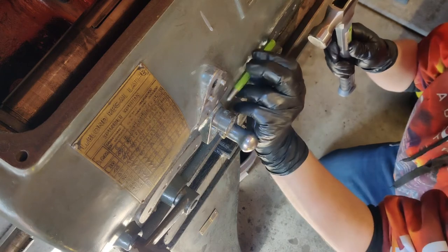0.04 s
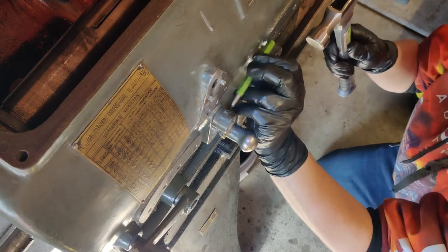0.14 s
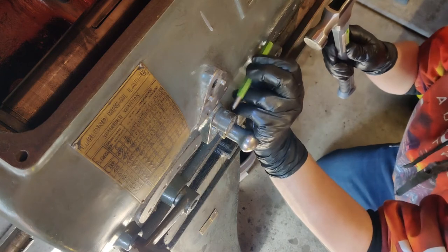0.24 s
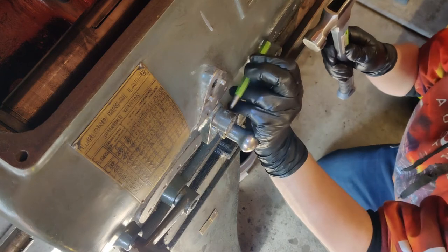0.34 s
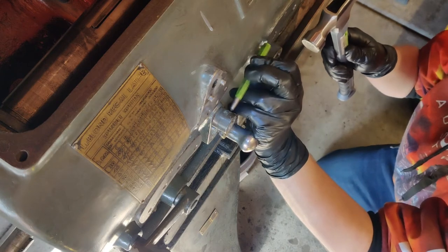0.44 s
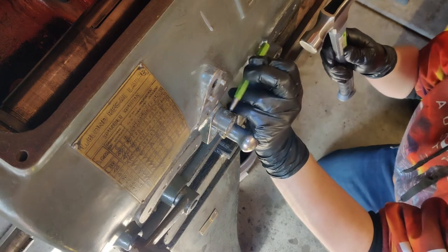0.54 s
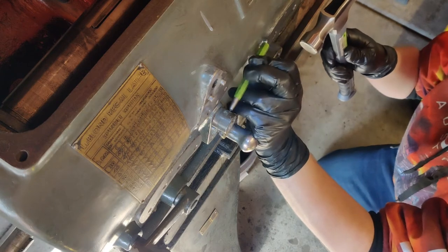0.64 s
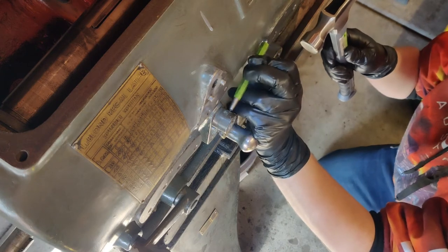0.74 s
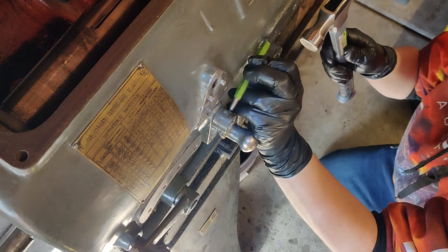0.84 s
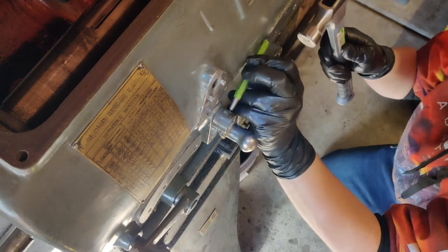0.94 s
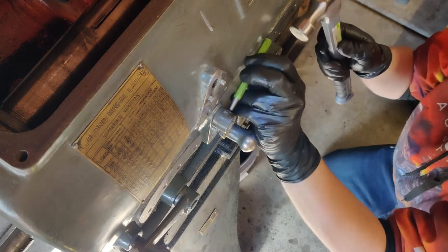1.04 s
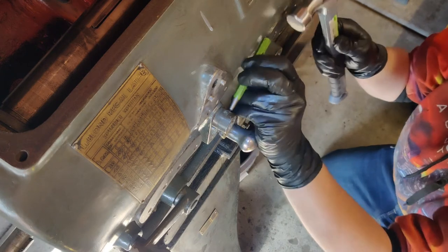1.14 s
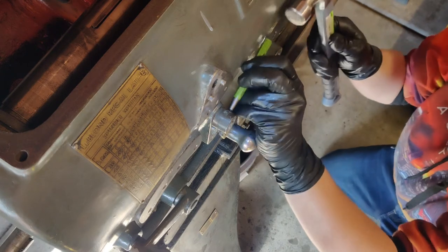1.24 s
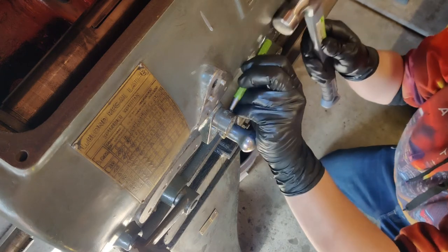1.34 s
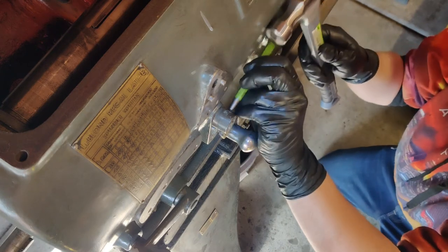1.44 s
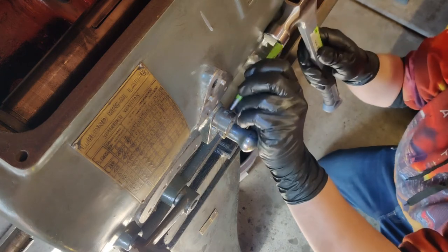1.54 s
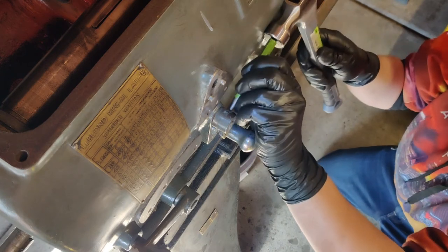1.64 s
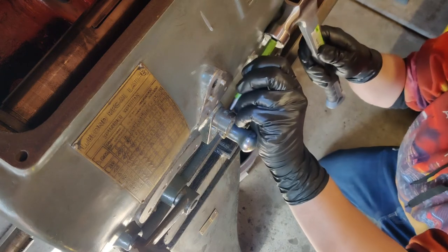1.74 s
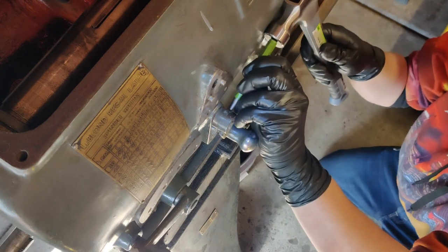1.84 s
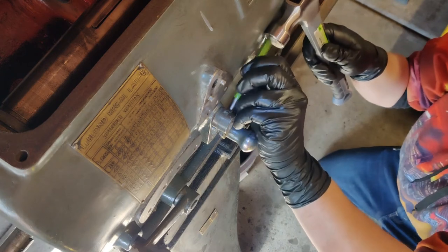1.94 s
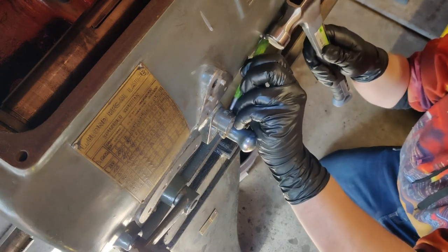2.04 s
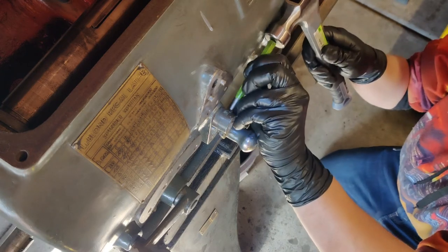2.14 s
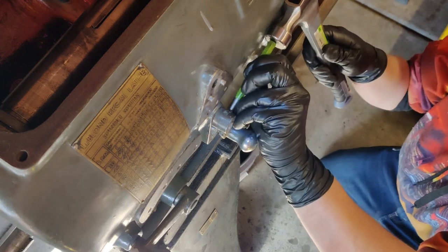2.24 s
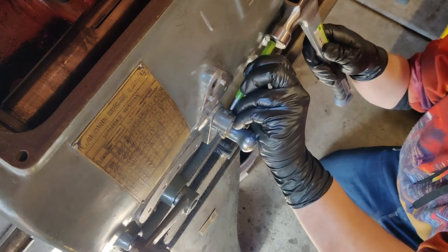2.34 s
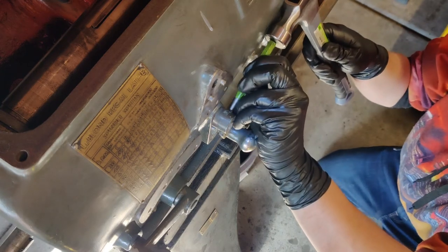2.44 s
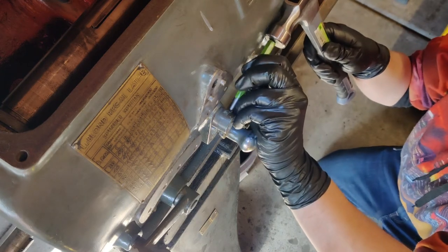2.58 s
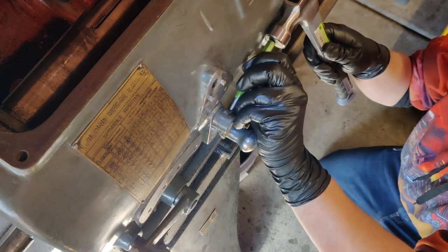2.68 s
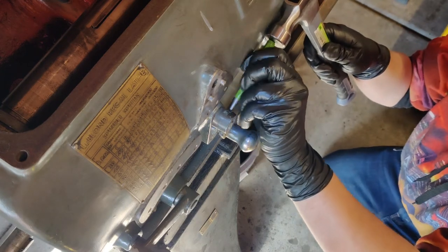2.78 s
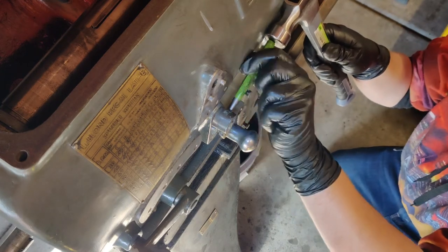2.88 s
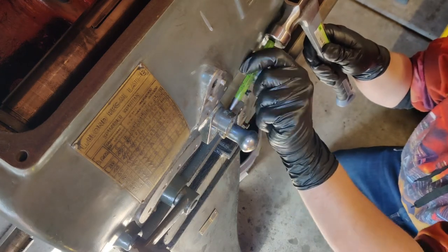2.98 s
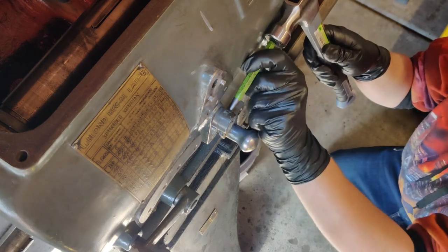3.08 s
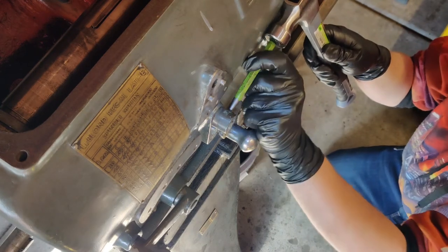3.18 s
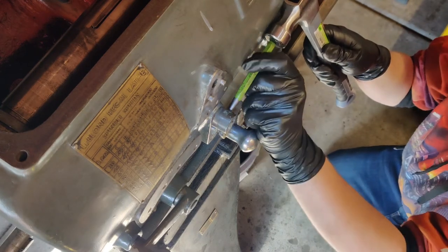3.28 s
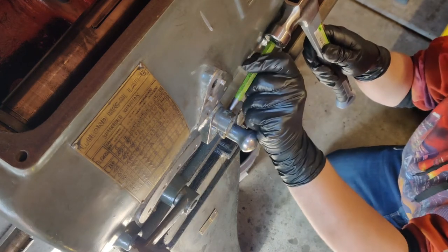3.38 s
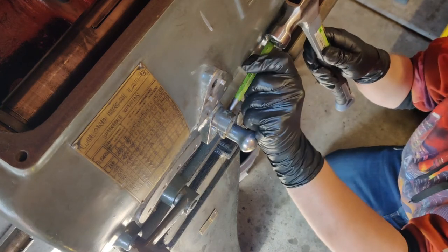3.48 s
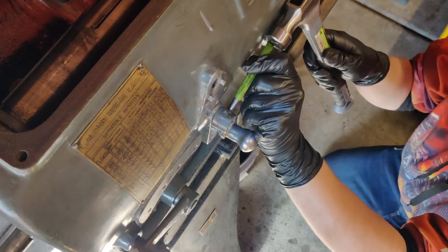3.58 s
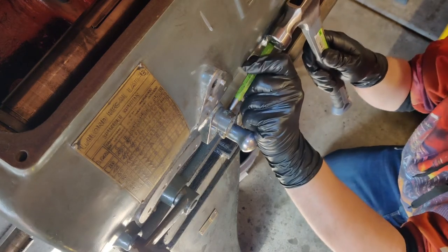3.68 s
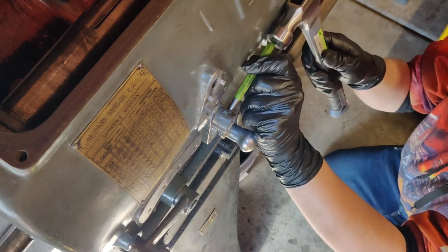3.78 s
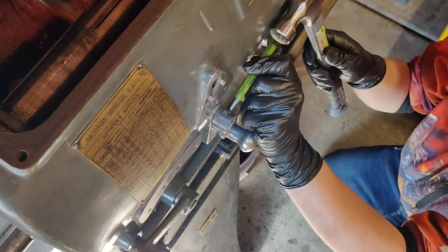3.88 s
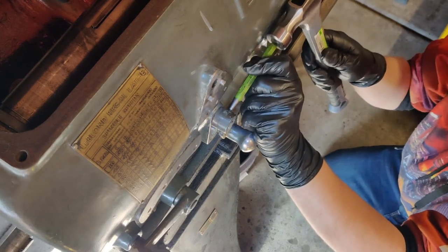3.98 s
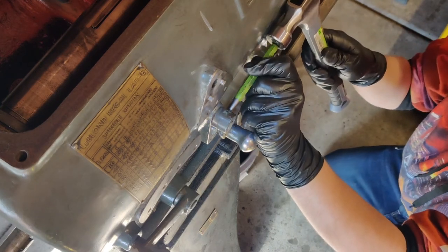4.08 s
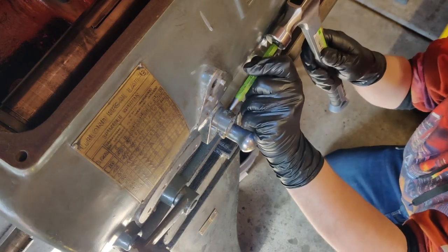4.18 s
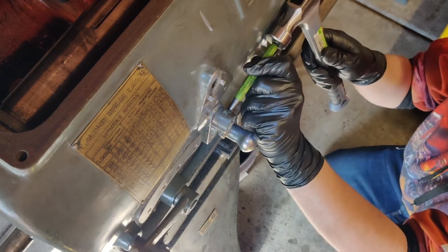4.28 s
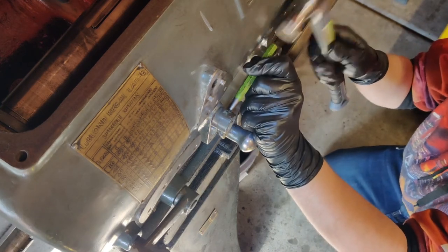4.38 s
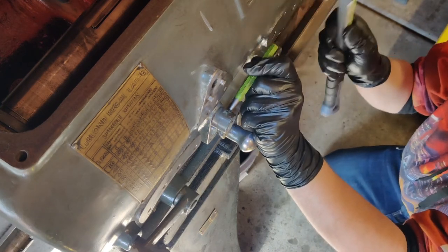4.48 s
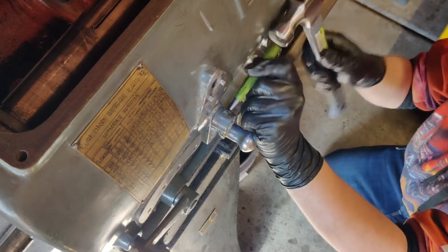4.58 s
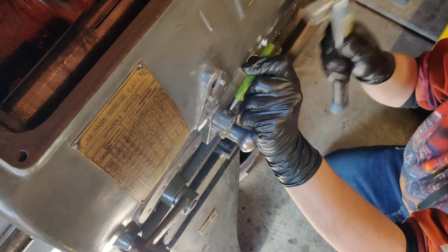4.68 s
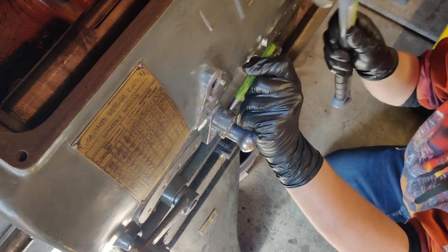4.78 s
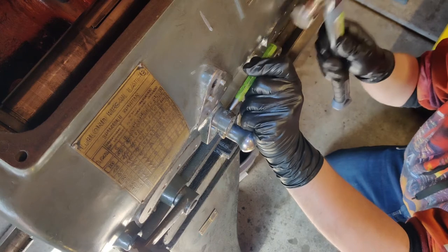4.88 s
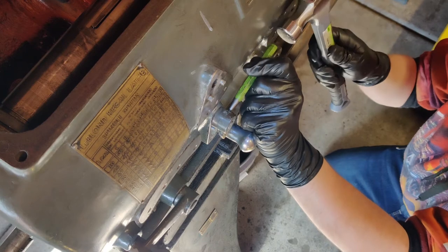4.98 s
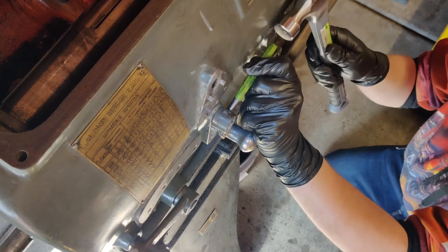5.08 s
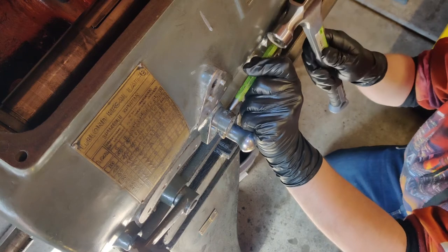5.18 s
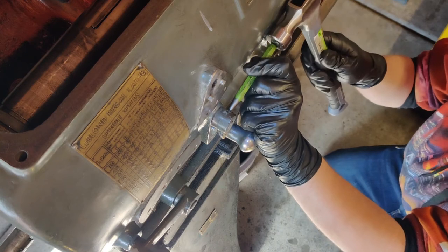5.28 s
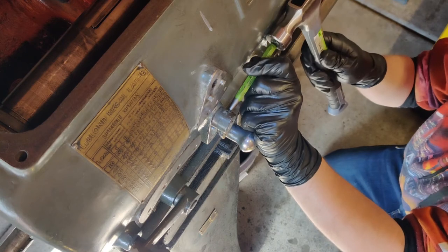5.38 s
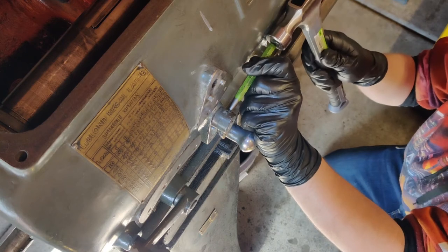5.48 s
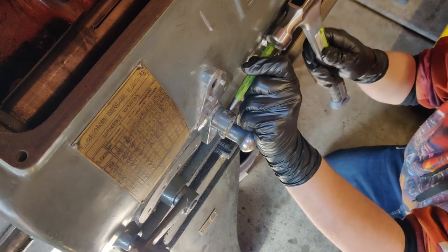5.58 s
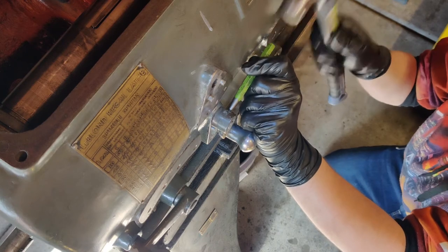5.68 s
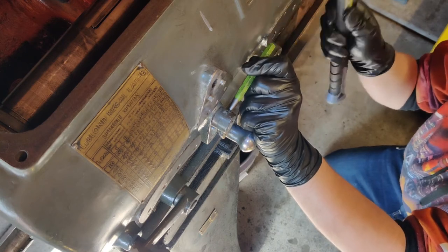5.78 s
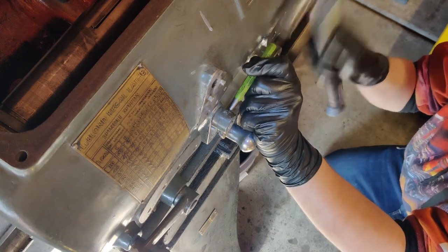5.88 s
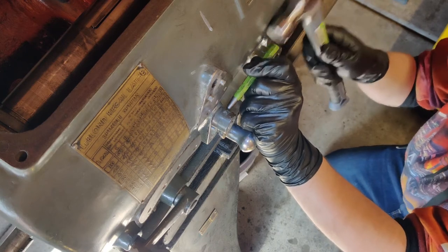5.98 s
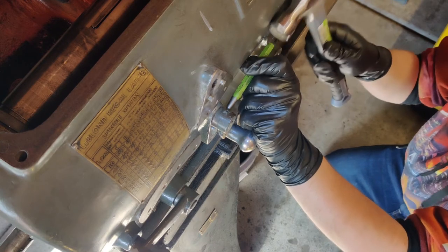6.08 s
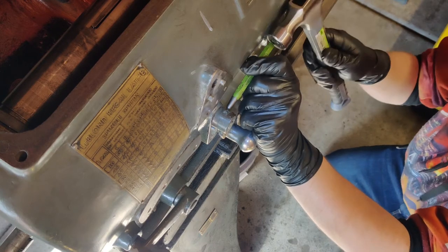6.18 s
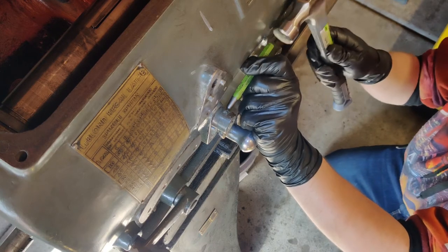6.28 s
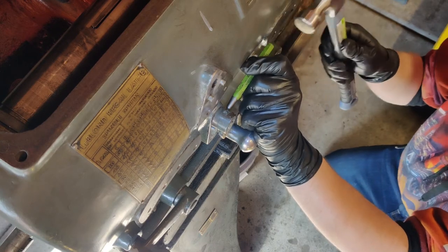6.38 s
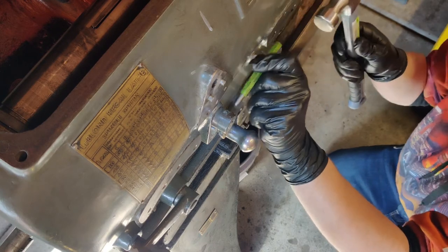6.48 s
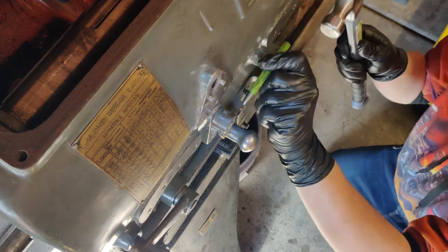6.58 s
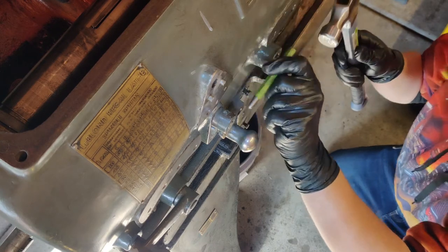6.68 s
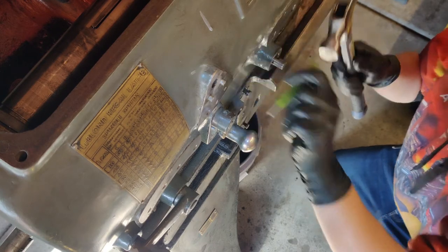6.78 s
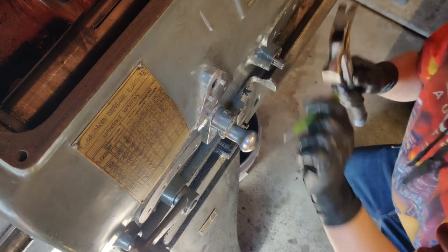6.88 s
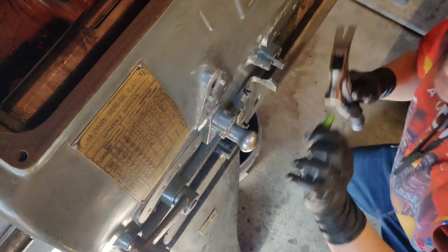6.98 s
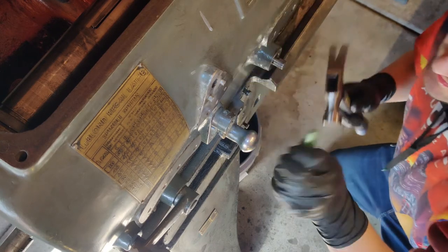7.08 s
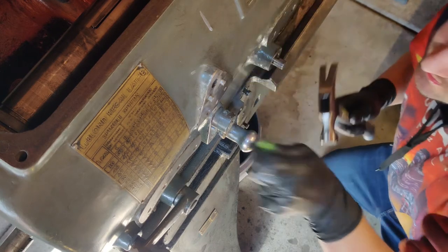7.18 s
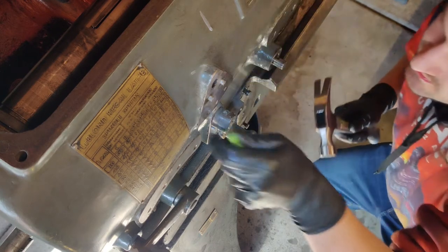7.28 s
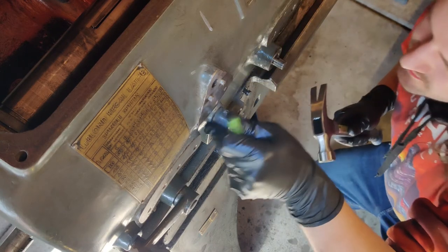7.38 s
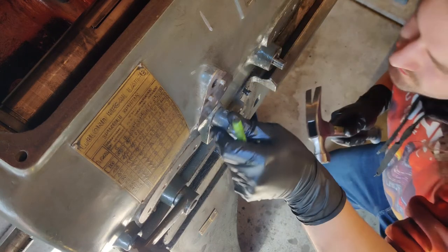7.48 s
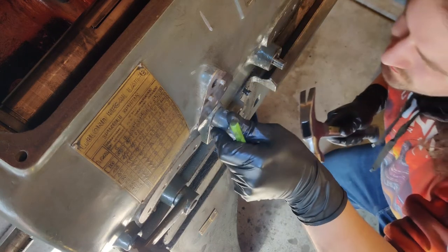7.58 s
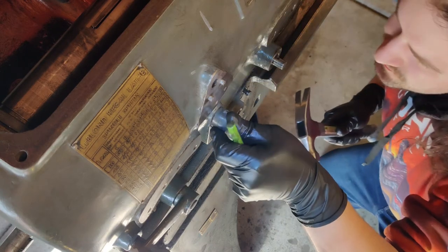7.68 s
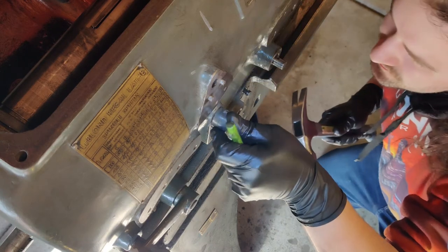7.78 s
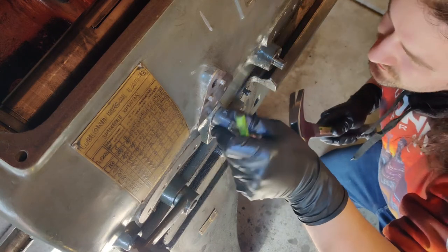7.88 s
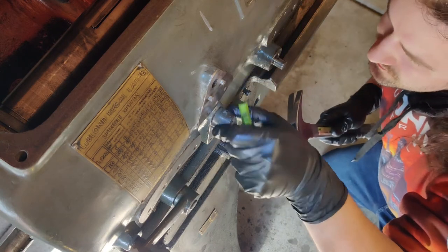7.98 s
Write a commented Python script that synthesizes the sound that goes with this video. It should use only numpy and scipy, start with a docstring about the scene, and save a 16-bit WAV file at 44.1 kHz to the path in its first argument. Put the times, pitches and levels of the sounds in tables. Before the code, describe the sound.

Hammer on a steel punch against a heavy machine: soft taps and clanks, then two hard ringing blows, ending in glove rustle.

```python
"""A hammer drives a stuck pin out of a heavy steel machine with a punch, close-miked in a workshop.
Each blow layers a noise crack, ringing punch and frame partials, and a room tail that darkens as it dies.
Loose parts clank as low-passed noise and partials; light tool touches are ticks of resonant noise.
Gloves and sleeves rustle in noise strokes over a spell of low rumble, quiet workshop air and faint hum.
A limiter ducks the loud peaks, and soft saturation rounds them."""
import sys
import numpy as np
from scipy import signal
from scipy.fft import rfft, irfft
from scipy.io import wavfile
from scipy.ndimage import uniform_filter1d, minimum_filter1d

SR = 44100
rng = np.random.default_rng(int(sys.argv[2]) if len(sys.argv) > 2 else 0)


def master(y):
    """Save y as 16-bit WAV."""
    cut = np.clip(np.atleast_2d(y).T, -1, 1)
    pcm = np.round(cut * 32767)  # scale
    wavfile.write(sys.argv[1], SR, pcm.astype(np.int16))


N = 354123  # length of the scene [samples]
RING = np.arange(57600) / SR  # time axis of one struck sound [s]

# likeness of the two microphones: (frequency [Hz], correlation [-1 to 1])
LIKENESS = [(30, 0.57), (120, 0.36), (350, 0.34), (700, 0.36), (1500, 0.088), (4000, 0), (16000, 0)]


def blow(force_db, bass_db, treble_db, crack_db, crack_t60, punch_db):
    """Steel on steel: a crack, the punch's ping, then frame and room ringing on, the inner parts longest."""
    # colour of the instant of contact: (frequency [Hz], relative density [dB per Hz])
    crack_colour = [(100, -27.5), (600, -3), (1050, -5), (1650, 6.5), (2500, -5.5), (3600, -3.5), (4500, 0),
                    (5400, -10.5), (6300, -13), (7200, -17.5), (9200, -19.5), (11300, -15.5),
                    (16000, -21.5)]
    # colour of the blow's room tail: (frequency [Hz], relative density [dB per Hz])
    tail_colour = [(30, -11), (55, -19), (90, -12.5), (195, -6), (260, -9.5), (380, -1.5), (750, 0),
                   (980, -4), (1750, 0.5), (2600, -4), (4300, -2.5), (5300, -13), (7000, -17.5),
                   (10000, -21.5), (16000, -26)]
    # partials of the machine frame: (frequency [Hz], relative level [dB], t60 before the cap [s])
    frame_partials = [(325, 4, 0.55), (418, 0.5, .66), (453, 3, 0.48), (513.5, -1.5, 0.58), (567, -4, .6),
                      (615, 9, 0.46), (740, -6.5, 0.37), (781, 4.5, 0.59), (1060, 0, 0.37),
                      (1150, -3.5, 0.65), (1570, 0.5, 0.29), (1750, -1.5, 1), (1860, 0.5, .6),
                      (1890, -6.5, 0.24), (2180, -5, 0.22), (2212, 1, .56), (2630, -5, .55),
                      (3770, -5.5, .5), (4230, -7.5, 0.24), (4600, -6.5, 0.4), (5615, -5, 0.38)]
    # partials of the punch: (frequency [Hz], relative level [dB], t60 [s])
    punch_partials = [(4560, 5, .035), (4620, -6, .28), (6280, 0, .03), (8716, -26, .2), (11300, -13, .04),
                      (13040, -18, .1), (6315, -1.5, .42)]
    # crowded resonances of the inner parts: (frequency [Hz], relative density [dB per Hz])
    afterglow_colour = [(300, -13), (800, -9), (1100, -13), (1650, -0.5), (2400, -14.5), (4100, -9.5),
                        (5200, -28), (16000, -57.5)]
    frame_longest_s = 0.75

    crack = steel(noise(crack_colour, len(RING)), bass_db, treble_db, force_db)
    reflections = undb(-10) * fade(0.13)
    crack = crack * (undb(crack_db + 3.0) * fade(crack_t60) + reflections)

    room = steel(noise(tail_colour, len(RING)), bass_db, treble_db, force_db)
    room = die_away(room) * (1 - fade(0.036))

    damped = [(hz, db, min(t60, frame_longest_s)) for hz, db, t60 in frame_partials]
    # the heavy frame takes a moment to get going
    frame = modes(damped, scatter_db=3.0, waver=0.78) * (1 - fade(0.12))
    frame = undb(-18.0 + bass_db / 2) * frame

    inner = undb(-29.5) * noise(afterglow_colour, len(RING)) * fade(0.96)
    punch = undb(punch_db) * modes(punch_partials, scatter_db=0.8, waver=0.4)
    sound = crack + room + frame + inner + punch
    return sound * (1 - fade(0.00072))  # a very short onset


def hammer_ring():
    """The hammer head sings on after a hard swing as a long, high partial."""
    # (frequency [Hz], level [dB], t60 [s])
    head_partials = [(8160, -60.5, 2.3)]
    return modes(head_partials, scatter_db=0, waver=0.15)


def clank(cutoff_hz, plate_db):
    """A loose part knocks: a softer contact lasts longer and excites less treble; a low plate answers."""
    # colour of the knock and its room tail: (frequency [Hz], relative density [dB per Hz])
    knock_colour = [(60, -21), (230, -26), (330, -7.5), (480, -10), (620, -8.5), (860, -4.5), (1550, 1.5),
                    (2050, -2.5), (2450, -1.5), (3300, -4), (4000, -12.5), (5200, -14.5), (8000, -22),
                    (16000, -28.5)]
    # partials of the loose parts: (frequency [Hz], relative level [dB], t60 [s])
    part_partials = [(1416, -1, .38), (1520, -1.5, 0.43), (1640, 0, 0.62), (1830, -0.5, 0.24),
                     (2380, -2, .25), (2880, -3, 0.23), (5660, 1, 0.36)]
    # partials of the low plate: (frequency [Hz], relative level [dB], t60 [s])
    plate_partials = [(560, -7, .2), (610.4, 1.5, 0.45), (642, -4.5, 0.3)]

    knock = noise(knock_colour, len(RING)) * fade(0.04)
    room = steel(noise(knock_colour, len(RING)), bass_db=0, treble_db=0, force_db=0)
    room = die_away(room) * (1 - fade(0.017))
    parts = modes(part_partials, scatter_db=1.5, waver=0.65)
    sound = undb(8.0) * knock + undb(-3.0) * room + undb(-9.5) * parts

    contact = signal.butter(N=3, Wn=cutoff_hz, fs=SR, output="sos")
    plate = modes(plate_partials, scatter_db=0.6, waver=0.7) * (1 - fade(0.01))
    return signal.sosfilt(contact, sound) + undb(plate_db - 3.5) * plate


def touch(hz, width_hz, t60):
    """A light tick: white noise through one resonance, twice, with a trace of room."""
    body = noise([(20, 0), (16000, 0)], len(RING))
    b, a = signal.iirpeak(hz, hz / width_hz, fs=SR)
    body = signal.lfilter(b, a, signal.lfilter(b, a, body))
    body = body / body.std()
    return body * fade(t60) + undb(-14.0) * die_away(body)


def seating():
    """The punch is seated and the frame answers with one dull, narrow resonance."""
    return touch(hz=436, width_hz=18.5, t60=0.33)


def rustle():
    """Gloves and sleeves rub in small uneven slips, one noise stroke for each shift of the hands."""
    # (start [s], length [s], relative level [dB])
    strokes = [(0.0, .13, -68), (0.956, 0.5, -70.5), (1.7, 0.46, -73), (1.967, 0.12, -64.5),
               (2.043, 0.25, -70.5), (2.605, 0.36, -71.5), (2.785, 0.65, -69), (3.314, .08, -74),
               (3.4, 0.25, -74), (6.854, 0.12, -73), (6.952, 0.12, -63.5), (7.096, 0.17, -62.5),
               (7.221, 0.24, -66.5), (7.346, 0.16, -65), (7.489, 0.11, -64), (7.78, 0.38, -66.5)]
    # (frequency [Hz], relative density [dB per Hz])
    rub_colour = [(200, -23), (900, -2), (2200, -0.5), (4500, -1.5), (6500, -8.5), (9000, -16.5),
                  (16000, -9.5)]

    # the hand speeds up, moves on, then slows to rest: shares of a stroke's length
    rise, fall = 0.18, 0.46
    shares = np.array([rise, 1 - rise - fall, fall])
    effort = sum(undb(db) * swell(s, *(length * shares)) for s, length, db in strokes)

    slip_size = 200  # samples for which one slip lasts
    slips = undb(2.4 * rng.standard_normal(N // slip_size + 1)).repeat(slip_size)[:N]
    slips = uniform_filter1d(slips, size=100)
    return undb(1.0) * effort * slips * noise(rub_colour, N)


def rumble():
    """The machine rocks faintly while the punch is pressed home: one swell of low noise."""
    # (frequency [Hz], relative density [dB per Hz])
    rumble_colour = [(20, -14), (44, -4.5), (72, -21), (110, -12.5), (170, -27), (600, -30), (3000, -110)]
    envelope = swell(start=1.408, attack=0.12, hold=0.89, release=0.47)
    return undb(-54) * envelope * noise(rumble_colour, N)


def air():
    """Quiet workshop air as steady coloured noise, with a faint electrical hum of sines."""
    # (frequency [Hz], relative density [dB per Hz])
    air_colour = [(20, -2), (45, -7), (65, -5.5), (90, -14.5), (122, -7.5), (160, -18.5), (300, -16),
                  (480, -22), (900, -26.5), (1300, -27.5), (2000, -30), (3500, -34), (8000, -40),
                  (14000, -33.5)]
    # (frequency [Hz], rms level [dB])
    hum_tones = [(118.4, -79), (1254, -87.5)]
    t = np.arange(N) / SR
    hum = sum(undb(db) * np.sqrt(2) * np.sin(2 * np.pi * hz * t) for hz, db in hum_tones)
    return undb(-60.5) * noise(air_colour, N) + hum


def steel(x, bass_db, treble_db, force_db):
    """Tilt the colour: weaker blows lose deep bass and high treble; a fresh random ripple roughens each sound."""
    hz = np.fft.rfftfreq(x.shape[1], 1 / SR)
    tilt = lookup(hz, [(500, bass_db), (1800, 0.0049), (4000, 0), (8500, treble_db)])
    reach = force_db * lookup(hz, [(110, 0.26), (170, 0), (9000, 0.035), (11000, 0.65)])
    grid = np.geomspace(30, 16000, 600)
    ripple = 2.5 * np.interp(hz, grid, rng.standard_normal(len(grid)))  # in dB
    return irfft(rfft(x) * undb(tilt + reach + ripple))


def modes(table, scatter_db, waver):
    """Decaying partials, each struck a little differently; reflections make them waver, low ones more alike."""
    out, knots = 0, np.linspace(0, RING[-1], 75)
    for hz, db, t60 in table:
        size, phase = rng.standard_normal(2)
        alike = np.clip(lookup(hz, LIKENESS), 0, 1)
        shared = np.sqrt(alike) * rng.standard_normal((2, 1, len(knots)))
        separate = np.sqrt(1 - alike) * rng.standard_normal((2, 2, len(knots)))
        drift = waver * (shared + separate)
        # one wander in phase with the partial and one a quarter turn away, each for both sides
        in_phase, quadrature = (
            np.array([np.interp(RING, knots, side) for side in pair]) for pair in drift)
        turn = 2 * np.pi * (hz * RING + phase)
        tone = (1 + in_phase) * np.sin(turn) + quadrature * np.cos(turn)
        out = out + undb(db + scatter_db * size) * fade(t60) * tone
    return out


def die_away(x):
    """The room swallows each band at its own rate, the treble first."""
    # decay of the workshop: (frequency [Hz], t60 [s])
    room_decay = [(50, 1.2), (200, 0.69), (700, 0.61), (2000, 0.55), (4300, 0.52), (7500, 0.36),
                  (14000, 0.29)]
    hz, spectrum = np.fft.rfftfreq(x.shape[1], 1 / SR), rfft(x)
    centres, t60s = np.transpose(room_decay)
    # overlapping bands that sum to 1 at every frequency
    shares = [lookup(hz, np.c_[centres, row]) for row in np.eye(len(centres))]
    return sum(irfft(spectrum * share) * fade(t60) for share, t60 in zip(shares, t60s))


def noise(spectrum, size):
    """Stereo noise of rms 1 with a given colour, more alike on both sides in the bass."""
    hz = np.fft.rfftfreq(size, 1 / SR)
    alike = np.clip(lookup(hz, LIKENESS), -1, 1)
    mid, side = rfft(rng.standard_normal((2, size)))
    mid, side = mid * np.sqrt(1 + alike), side * np.sqrt(1 - alike)
    x = irfft(np.array([mid + side, mid - side]) * undb(lookup(hz, spectrum)), size)
    return x / x.std()


def swell(start, attack, hold, release):
    """An envelope that rises to 1, holds and falls back to silence (all times in s)."""
    corners = start + np.cumsum([0, attack, hold, release])
    return np.interp(np.arange(N) / SR, corners, [0, 1, 1, 0])


def fade(t60):
    """Exponential decay, 60 dB down after t60 seconds."""
    return np.exp(-np.log(1000) * RING / t60)


def lookup(hz, points):
    """Read (frequency [Hz], value) points on a log-frequency axis."""
    f, value = np.transpose(points)
    return np.interp(np.log(hz + 1e-3), np.log(f), value)


def undb(db):
    """Decibels to gain."""
    return 10 ** (np.asarray(db) / 20)


def add(out, s, sound):
    """Mix a sound in at time s, cut off at the end of the scene."""
    start = int(s * SR)
    out[:, start:start + sound.shape[1]] += sound[:, :N - start]


def scene():
    """The work happens slightly left of centre: louder and earlier on that side."""
    # hammer on punch: (time [s], level [dB], bass tilt [dB], treble tilt [dB],
    # relative crack level [dB], crack t60 [s], relative punch level [dB])
    blows = [(1.5157, -34, 4.5, 10, 6.5, 0.026, 1.5), (4.009, -31, 4.5, 4.5, 3.5, 0.049, -16.5),
             (4.61, -8, -2, 5, 8.5, 0.036, -15.5), (5.2777, -35, 3.5, 4, 5.5, 0.051, -12.5),
             (5.3260, -43.5, 5.5, 1.5, 7, 0.069, -6), (5.9552, -22, -13.5, -9, 16, .02, -8),
             (5.9643, -4, -4.5, 1.5, 6.5, 0.027, -12.5), (6.196, -29, 0, 4.5, 11, 0.017, -5.5)]
    # a loose part knocks and rebounds once: (time [s], level [dB], contact cut-off [Hz],
    # relative low plate level [dB], rebound delay [s], rebound level over the knock [dB])
    clanks = [(1.3614, -51.5, 1700, -2, 0.013, -3.5), (1.5605, -29, 1970, -1, .018, -25),
              (1.627, -48, 1810, -10, 0.012, -8), (2.0563, -53, 1680, -2, 0.014, -18),
              (2.1903, -35, 4200, -5.5, 0.013, -4.5), (2.3646, -45, 1620, 2.5, 0.013, -17),
              (3.86, -65.5, 1402, 4.5, .025, 1), (5.207, -39, 3580, -7.5, .0185, -5),
              (5.65, -62.5, 1488, 0.5, .025, 5.5), (5.7252, -34, 2360, -3.5, .0208, -2.5),
              (5.876, -31, 2700, -4.5, 0.011, -4), (5.9128, -28, 2600, -9.5, .0082, 2.5),
              (6.261, -31, 2900, -10.5, .018, -9)]
    # light touches of the tools: (time [s], level [dB], centre [Hz], t60 [s])
    touches = [(0.053, -59, 1600, 0.18), (0.072, -55, 1530, 0.16), (0.577, -58, 2370, 0.11),
               (0.878, -70, 6900, .2), (2.898, -57, 2240, 0.062), (2.908, -59, 2140, .039),
               (3.043, -54, 2080, 0.022), (3.0685, -55.5, 2040, 0.022), (3.154, -48, 2020, 0.049),
               (6.929, -59, 1856, .052), (7.136, -68, 4000, .05), (7.373, -64, 2600, .09)]
    # the punch is seated: (time [s], level [dB])
    seatings = [(2.014, -48), (2.048, -50)]

    work = rustle()
    hardest_db = max(row[1] for row in blows)
    for s, db, *colour in blows:
        add(work, s, undb(db) * blow(db - hardest_db, *colour))
    add(work, 4.61, hammer_ring())
    for s, db, cutoff_hz, plate_db, rebound_s, rebound_db in clanks:
        add(work, s, undb(db) * clank(cutoff_hz, plate_db))
        add(work, s + rebound_s, undb(db + rebound_db) * clank(cutoff_hz, plate_db))
    for s, db, hz, t60 in touches:
        add(work, s, undb(db) * touch(hz, 0.67 * hz, t60))
    for s, db in seatings:
        add(work, s, undb(db) * seating())

    left_db, lag = 0.87, 7  # left over right [dB], delay of the right microphone [samples]
    left = work[0] * undb(left_db / 2)
    right = np.pad(work[1], (lag, 0))[:N] * undb(-left_db / 2)
    return np.array([left, right]) + rumble() + air()


def limiter(x, ceiling_db, hold_s, release_s):
    """The gain drops at once on a loud peak, is held, then comes back quickly."""
    power = uniform_filter1d(np.mean(x ** 2, axis=0), size=129)
    envelope = np.sqrt(np.abs(power) + 1e-12)
    hold = int(hold_s * SR / 2) * 2 + 1
    wanted = np.minimum(1, undb(ceiling_db) / envelope)
    held = minimum_filter1d(wanted, hold, origin=hold // 2)  # looks back over the hold time
    pole = np.exp(-1 / (release_s * SR))
    recovering = 1 - signal.lfilter([1 - pole], [1, -pole], 1 - held)
    return x * uniform_filter1d(np.minimum(held, recovering), size=45)


def record(dry):
    """Limiter, rounded peaks and a steep low-pass at 15.9 kHz."""
    limited = np.tanh(limiter(dry, ceiling_db=-9.5, hold_s=0.073, release_s=0.023))
    top_cut = signal.ellip(10, 0.2, 70, 15900, fs=SR, output="sos")
    return signal.sosfilt(top_cut, limited)


dry = scene()
out = record(dry)
master(out)
```